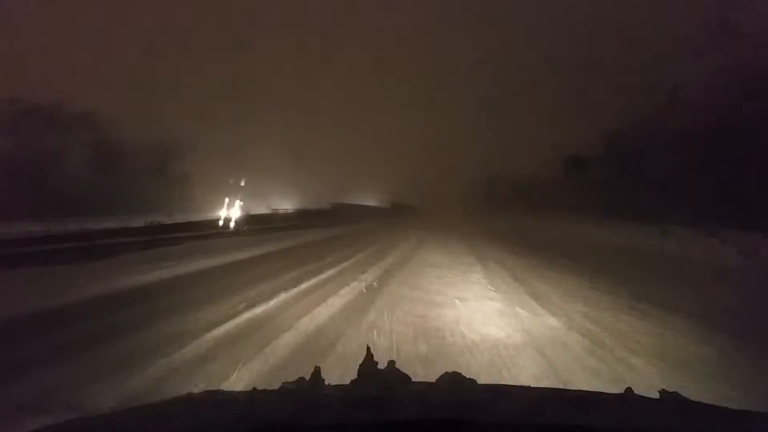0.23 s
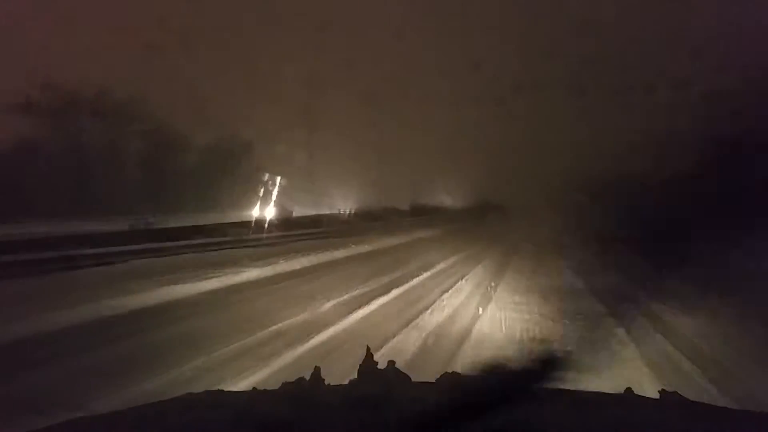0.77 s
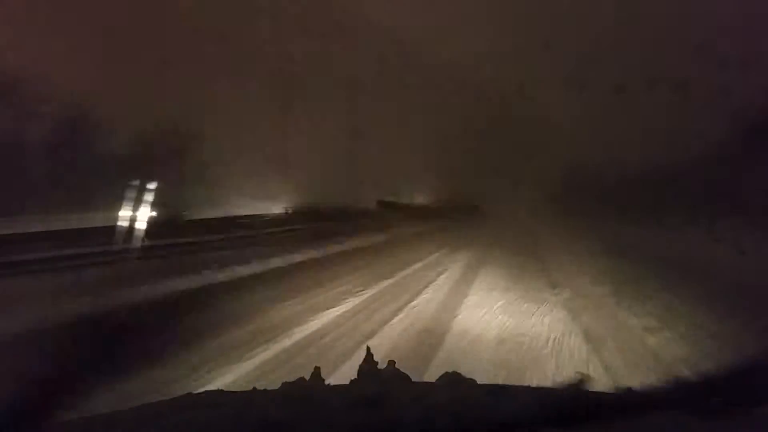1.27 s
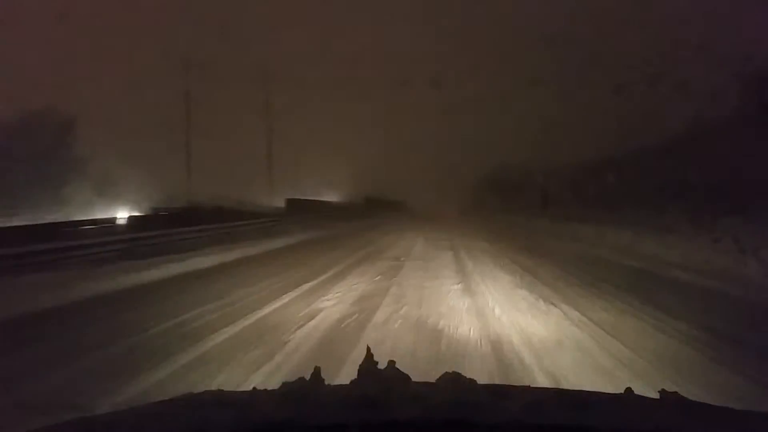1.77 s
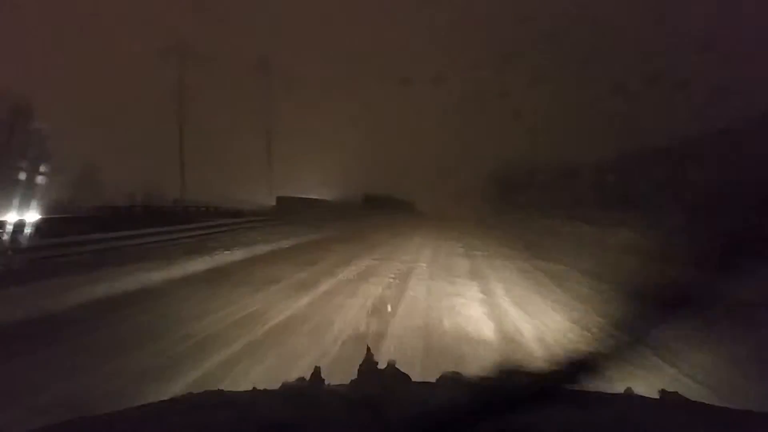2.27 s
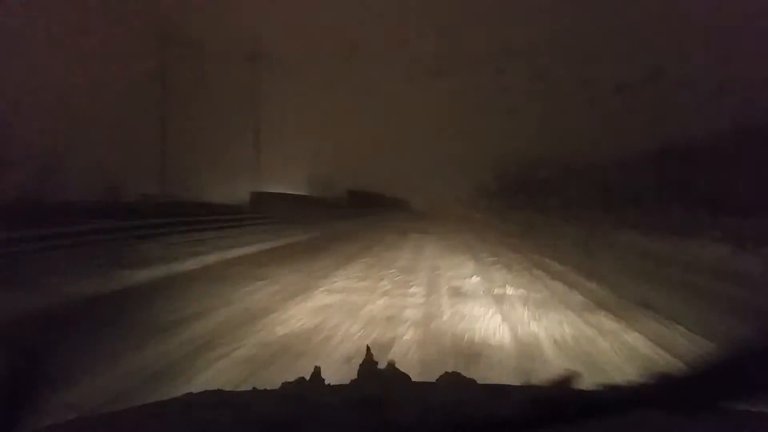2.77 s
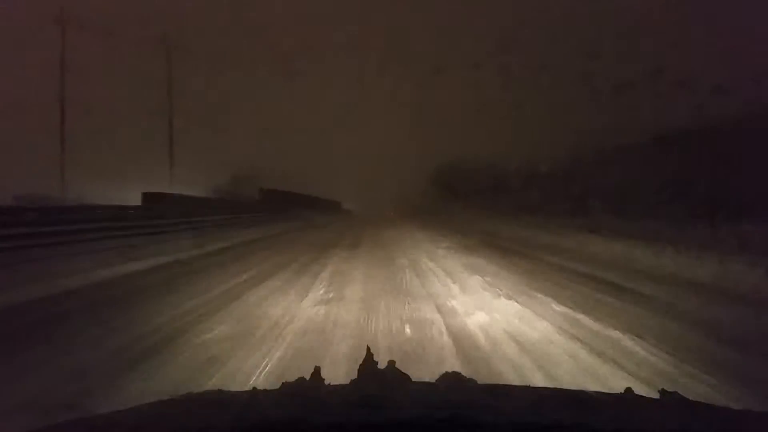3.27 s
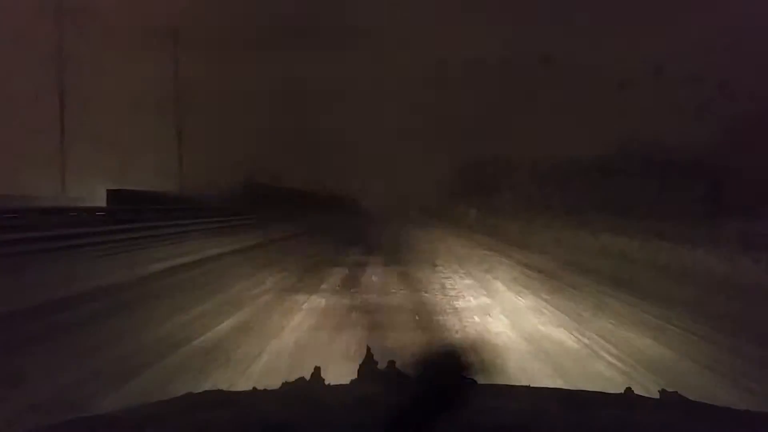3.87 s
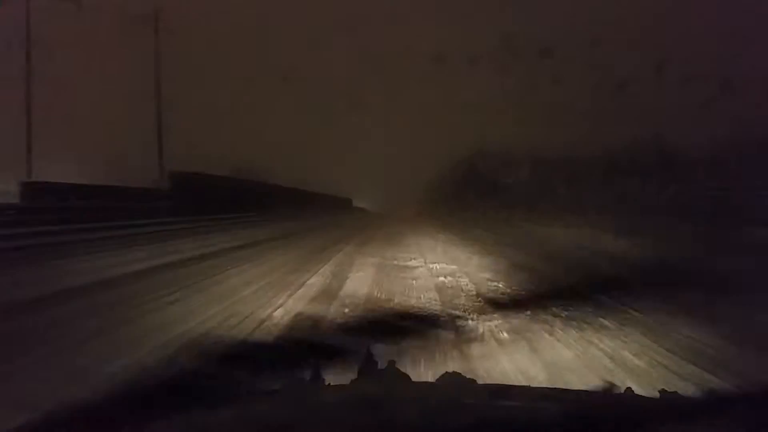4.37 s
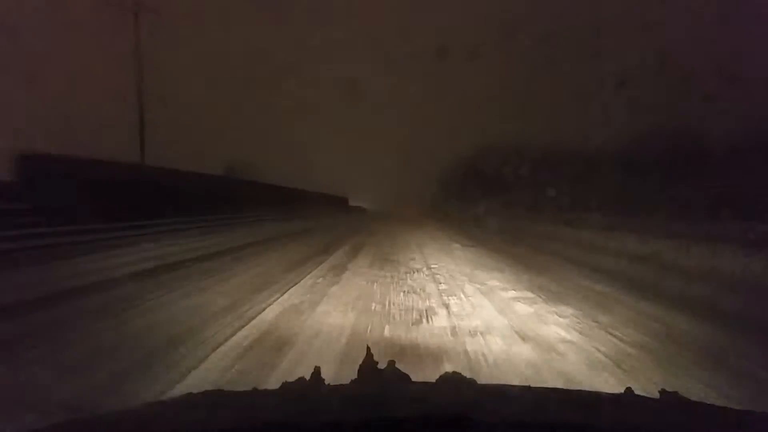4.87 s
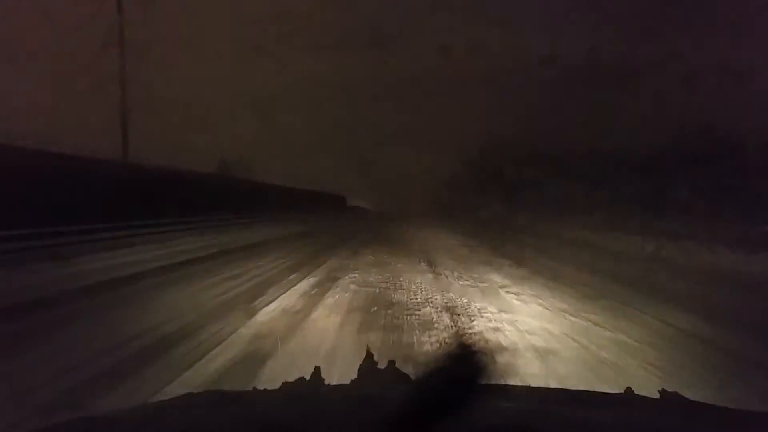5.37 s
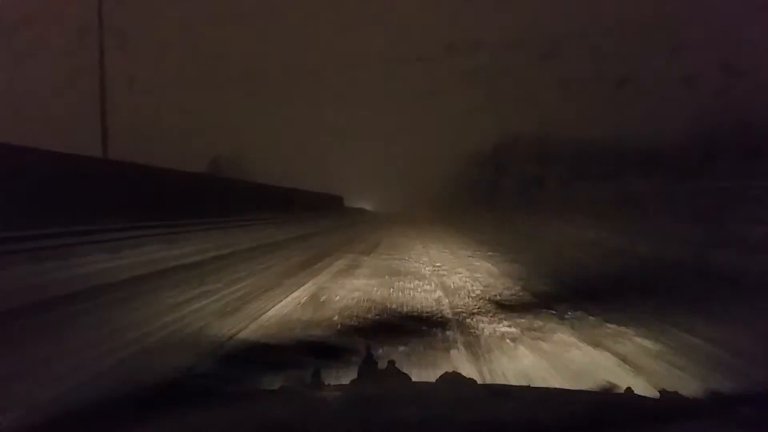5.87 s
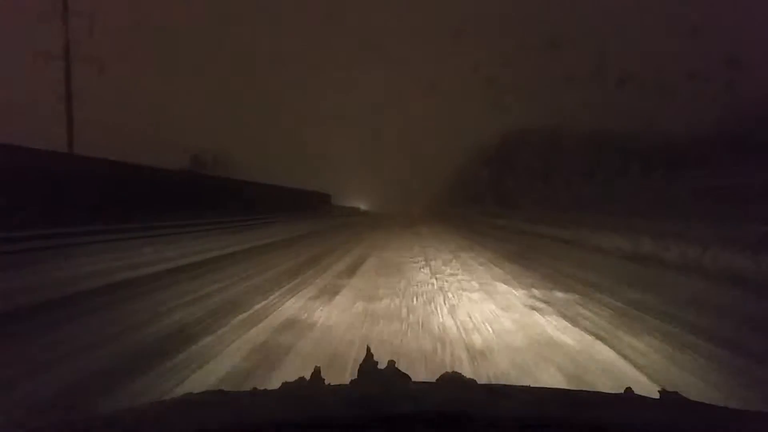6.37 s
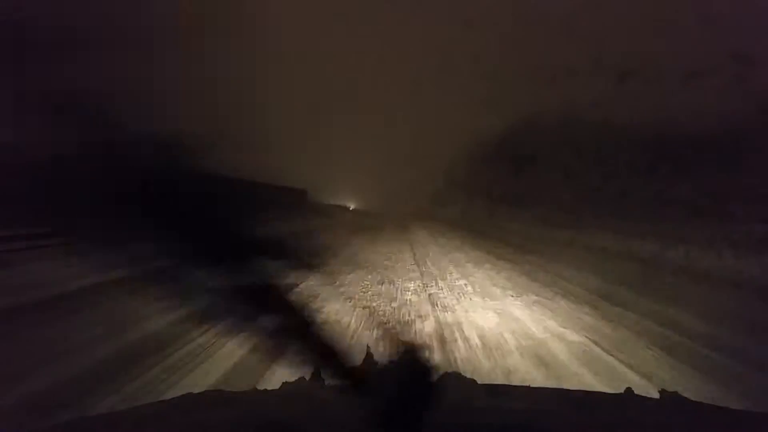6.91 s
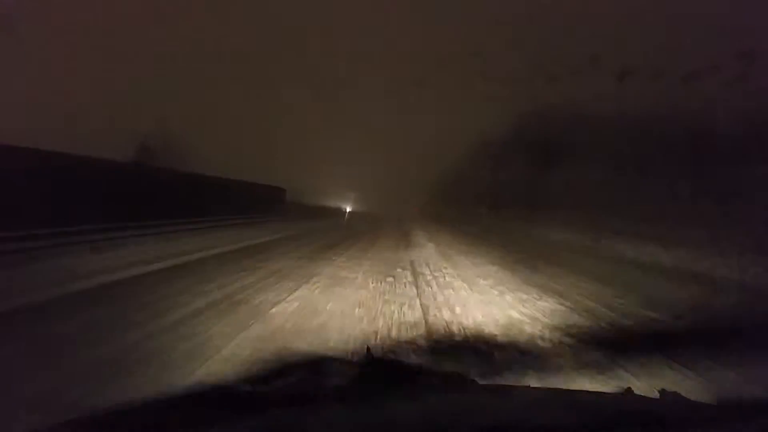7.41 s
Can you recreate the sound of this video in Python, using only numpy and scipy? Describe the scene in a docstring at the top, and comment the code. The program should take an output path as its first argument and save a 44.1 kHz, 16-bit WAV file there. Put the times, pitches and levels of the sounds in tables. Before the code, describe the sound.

From start to finish, about seven and a half seconds, a deep road boom fills the cabin of a car rolling on packed snow, swelling and easing with low bumps. The microphone lies on the dashboard, which shakes and rattles, more on the left. Wipers sweep every second and a half, with a rubbery judder, a dull scrape and small ticks. Quick clusters of knocks mark one end of the stroke at about 0.2, 1.7, 3.3, 4.8, 6.3 and 7.6 seconds; single knocks fall between, clearest near 0.5, 1, 2.5, 4.2 and 5.5 seconds. The knock at 3.3 seconds is the loudest, a hard crack that briefly overloads the microphone. The rumble eases around 2.3, 4 and 6.9 seconds and grows again at the end. Muffled tyre crunch and a faint spray hiss continue underneath, with thin high spits near 3 and 5 seconds.

```python
"""Car on packed snow, wipers running

A phone lies on the dashboard at night, the wipers sweeping every second and a half. The cabin air
booms with the road and bumps with the sweeps; wiper judder, knocks and snow lumps excite the
resonances of the dash, which the left port touches. Blades scrape and tick, one knock cracks hard,
the treads crunch, and snow spray hisses faintly, with a few thin spits."""
import sys
import numpy as np
from scipy import signal
from scipy.fft import rfft, irfft
from scipy.io import wavfile
from scipy.ndimage import uniform_filter1d, minimum_filter1d

SR = 44100
rng = np.random.default_rng(int(sys.argv[2]) if len(sys.argv) > 2 else 0)


def to_wav(sig):
    """Store sig (one row per channel, or 1-D mono) as 16-bit WAV at the path in sys.argv[1].

    Samples outside -1..1 are clipped; the rate is SR.
    """
    pcm = np.clip(np.atleast_2d(sig), -1, 1) * 32767
    pcm = np.round(pcm).astype(np.int16)
    wavfile.write(sys.argv[1], SR, pcm.T)  # frames by channels


N = 337227

# roughness of the snow under the wheels: t/s, boom level/dB, dash shake level/dB, grit level/dB
ROUGHNESS = [(0.0, -24.5, -24, -55.5), (0.78, -28, -27.5, -58.5), (0.93, -26.5, -27, -56.5),
             (1.36, -28.5, -33, -64.5), (1.91, -27.5, -29.5, -59.5), (2.19, -32.5, -33.5, -65),
             (2.52, -32.5, -32, -63.5), (2.89, -26, -29, -57.5), (3.42, -26.5, -26, -59),
             (3.73, -31, -32, -66.5), (4.2, -33, -34.5, -64.5), (4.73, -25.5, -26.5, -59),
             (5.14, -25, -28.5, -57), (5.92, -25, -27.5, -62), (6.13, -24.5, -26.5, -58),
             (6.88, -31.5, -34, -66.5), (7.49, -22.5, -25, -56), (7.62, -24, -25, -56)]
# snow spray: t/s, level/dB
SPRAY_LEVEL = [(0, -61), (.5, -66), (1.3, -65), (1.8, -67), (2.45, -70), (2.85, -62.5), (3.2, -61.5),
               (3.4, -70), (4.05, -75.5), (4.4, -66), (4.75, -65), (5.4, -65), (5.95, -64), (6.4, -68),
               (6.95, -76), (7.45, -62), (7.65, -59)]
# knocks of wiper arms and snow lumps: t/s, level/dB, thud relative to that level/dB
IMPACTS = [(0.203, -4.5, -21), (0.223, -6.5, -19), (0.243, -8, -18), (0.269, -13, -18), (0.43, -16, -15),
           (0.516, -4, -3), (0.53, -9, -10), (0.728, -16, 0), (0.813, -12, -2), (0.972, -3.5, -22),
           (1.159, -11.5, -19), (1.191, -11.5, -17), (1.64, -16, -10), (1.717, -2.5, -16), (1.742, -6, -18),
           (1.757, -7, -18), (1.786, -14, -18), (1.956, -10, -19), (2.493, -8, -11), (2.545, -15, -15),
           (2.678, -13, -12), (2.806, -15.5, 10), (3.034, -13.5, -23.5), (3.16, -17.5, -18),
           (3.247, -6, -15.5), (3.252, 0, -20), (3.264, -7, -15), (3.285, -10, -15), (3.317, -14, -15),
           (3.479, -14, -12), (3.671, -18.5, -10), (3.896, -20.5, 6), (4.025, -16, -7), (4.087, -14.5, -16),
           (4.206, -18, -7), (4.242, -4.5, -16), (4.589, -14, -12), (4.768, -9, -26), (4.789, -8.5, -29.5),
           (4.968, -20, -14), (5.075, -12, -15), (5.165, -17, -12), (5.315, -17, -8), (5.54, -3.5, -16),
           (5.586, -11.5, -11), (5.714, -13, -2.5), (5.752, -7, -8), (5.849, -13, -6), (5.958, -13.5, -9),
           (6.179, -16, -13.5), (6.256, -7, -16), (6.278, -9, -16), (6.863, -20, 4), (6.902, -20, -12),
           (7.025, -13.5, -11), (7.267, -14, -12), (7.597, -7, -20), (7.61, -9, -20)]


def undb(db):
    """Amplitude ratio of a level."""
    return 10 ** (np.asarray(db) / 20)


def curves(table):
    """Columns of a table, interpolated linearly in time."""
    times, *columns = np.transpose(table)
    return [np.interp(np.arange(N) / SR, times, column) for column in columns]


def walk(rate_hz):
    """Slow fluctuation: random steps, smoothed twice; spread near 1."""
    hold = int(SR / rate_hz)
    steps = np.repeat(rng.standard_normal(N // hold + 1), hold)
    return 1.3 * uniform_filter1d(uniform_filter1d(steps, hold), hold)[:N]


def through(x, path, ring=1, size=16384):
    """Minimum-phase filter to each port. Path columns: f/Hz, relative gain left/dB, right/dB."""
    # resonances of cabin and dash: f/Hz, bandwidth/Hz, lift left/dB, right/dB
    modes = [(35, 68, 7.5, 8), (45.5, 29, 0, 0), (83.5, 4, 3.5, 8), (109.2, 78, 8.5, 5),
             (158.9, 10, 8.5, 4), (215, 8.6, 10.5, 4), (252, 7.7, 5, 11), (326.5, 11, 8, -0.5),
             (366.4, 30, 9.5, 0.5), (417, 24, -1, 2.5), (535.7, 84, 6, -1), (704.6, 160, 6.5, -2),
             (719, 35, -2.5, 8.5), (1047, 62, 6, 4.5), (2100, 140, 1.5, 1.5)]
    hz = np.arange(size // 2 + 1) * SR / size + 1
    path_hz, *sides = np.transpose(path)
    lift = sum(np.outer(db, 1 / (1 + (2 * (hz - f) / width) ** 2)) for f, width, *db in modes)
    colour = np.array([np.interp(np.log(hz), np.log(path_hz), db, left=-90, right=-150) for db in sides])
    cepstrum = irfft(np.log(undb(colour + ring * lift)))
    fold = np.where(np.arange(size) < size // 2, 2., 0.)  # folding makes the response causal
    fold[0] = 1
    response = irfft(np.exp(rfft(cepstrum * fold)))[:, :size // 2]
    response *= np.hanning(size)[size // 2:]
    response /= np.sqrt(np.sum(response.mean(axis=0) ** 2))
    return signal.fftconvolve(x, response, axes=1)[:, :N]


def pair(correlation):
    """Partly coherent white noise for the two ports."""
    a, b = rng.standard_normal((2, N))
    return np.array([a, correlation * a + np.sqrt(1 - correlation ** 2) * b])


def bursts(times, level_db, decay_s, rise_s=1e-5):
    """Envelope that rises at each time and decays exponentially."""
    envelope = np.zeros(N)
    for onset, db, decay in np.broadcast(times, level_db, decay_s):
        i = int(onset * SR)
        t = np.arange(1, min(int(6 * decay * SR) + 2, N - i + 1)) / SR
        envelope[i:i + len(t)] += undb(db) * np.exp(-t / decay) * (1 - np.exp(-t / rise_s))
    return envelope


def lumps(rate_hz, spread_db, decay_s):
    """Shot-noise envelope: random jolts over a steady bed; rms 1."""
    when, size = rng.random((int(rate_hz * N / SR), 2)).T
    envelope = .5 + bursts(when * N / SR, -spread_db * np.log(size + 1e-6), decay_s)
    return envelope / np.sqrt(np.mean(envelope ** 2))


def cabin_boom():
    """Forced vibration: the cabin air booms with the road and with low bumps; each knock adds a thud."""
    # low booming bumps, some from the road and one with each wiper sweep: t/s, level/dB, decay time/s
    low_bumps = [(0.059, -21.5, .04), (.5, -18, .04), (.86, -21, 0.032), (1.928, -19, .05), (2.0, -17, .05),
                 (2.36, -20.5, .02), (2.688, -16.5, .03), (2.8, -12.5, 0.031), (3.139, -20, 0.052),
                 (3.457, -17.5, 0.044), (3.62, -21.5, 0.019), (3.89, -21, 0.028), (5.0, -18, .03),
                 (5.3, -21, .04), (5.569, -20, 0.037), (5.825, -17.5, 0.027), (5.949, -16, 0.041),
                 (6.11, -18.5, 0.054), (6.46, -19, 0.038), (6.58, -23, 0.028), (7.128, -20.5, .03),
                 (7.527, -15.5, 0.053)]
    # cabin air: f/Hz, left/dB, right/dB
    path = [(16.1, -19, -17), (29.6, -1.5, -3.5), (60, -5, -9), (121.6, 0.5, -6.5), (173, -15, -19.5),
            (282, -30.5, -33), (540, -61.5, -64.5)]
    times, level_db, thud_db = np.transpose(IMPACTS)
    rolling = undb(curves(ROUGHNESS)[0] + 1.5 * walk(12))
    bumps = bursts(*np.transpose(low_bumps), rise_s=.015)
    thuds = bursts(times, level_db + thud_db - 5.5, decay_s=.0035)
    return through((rolling + bumps + thuds) * pair(.82), path)


def wiper_gains():
    """Cyclic modulation: judder and scrape gains follow one stroke shape, once a sweep."""
    # marks at upper turn, lower turn and halfway up: t/s, sweeps done, judder/dB, scrape/dB
    sweeps = [(-.535, 0, -16, -46), (.225, .5, -15, -46.5), (.52, .69, -13, -44), (.972, 1, -16, -46),
              (1.74, 1.5, -13, -45), (2.0, 1.69, -13, -45), (2.493, 2, -18, -47), (3.26, 2.5, -12, -42),
              (3.52, 2.69, -14, -45), (4.025, 3, -20, -48), (4.785, 3.5, -16, -46), (5.04, 3.69, -17, -45),
              (5.54, 4, -16, -46), (6.275, 4.5, -14, -45), (6.53, 4.69, -15, -46.5), (7, 5, -19, -49),
              (7.79, 5.5, -14, -45)]
    # one sweep, upper turn at 0, lower near .5: phase/cycles, judder/dB, scrape/dB
    stroke = [(0, -24, -18), (.008, -4, -7), (.025, -10, -14), (.04, -7, -3), (.065, -18, -20),
              (.11, -28, -26), (.125, -9, -9.5), (.147, -3, -5), (.175, -18, -18), (.215, -11, -6),
              (.24, -20, -24), (.3, -20, -20), (.36, -11, -14), (.42, -13, -9), (.475, -10, -7), (.5, 0, 0),
              (.525, -5, -4), (.545, -18, -20), (.61, -20, -19), (.65, -6, -7), (.7, -5, -8),
              (.745, -10, -9), (.79, -26, -26), (.905, -30, -30), (.922, -14, -9.5), (.94, -30, -28),
              (1, -24, -18)]
    done, *sweep_db = curves(sweeps)
    phase, *stroke_db = np.transpose(stroke)
    return [undb(np.interp(done % 1, phase, shape) + db) for shape, db in zip(stroke_db, sweep_db)]


def dash_judder(wiper_gain):
    """Structure-borne sound: road and wipers shake the dash, adding in power."""
    # dash panel: f/Hz, left/dB, right/dB
    path = [(64.8, -35.5, -31.5), (135, -11, -15.5), (217, -2, -15.5), (314, 2, -16), (414, -4, -16.5),
            (613, -16.5, -26.5), (838, -28, -36.5), (1130, -47.5, -45), (1910, -73, -78.5)]
    shake = np.hypot(undb(curves(ROUGHNESS)[1]), wiper_gain)
    return through(shake * lumps(140, .27, .006) * pair(.7), path)


def blade_scrape(wiper_gain):
    """Friction noise: rubber on ice makes a dull swish, adding in power to the road's grit."""
    # scrape spectrum: f/Hz, left/dB, right/dB
    path = [(480, -15.5, -23.5), (961, -7.5, -10), (1340, -16, -21), (1690, -25.5, -26.5),
            (2650, -24.5, -33.5), (3780, -33.5, -41.5), (4530, -38, -44.5), (5500, -59, -65.5)]
    grit = np.hypot(undb(curves(ROUGHNESS)[2]), wiper_gain)
    return through(grit * lumps(300, .5, .005) * pair(.071), path)


def tyre_crunch():
    """Transmission loss: the floor muffles snow crunching under the treads; it swells with the spray."""
    # floor: f/Hz, left/dB, right/dB
    path = [(490, -10.5, -16), (1000, -3.5, -5), (1570, -15, -14), (2500, -19.5, -22.5), (3500, -24, -33),
            (4800, -31.5, -40), (5600, -58.5, -62.5)]
    level_db = .62 * curves(SPRAY_LEVEL)[0] - 25.5 + 1.1 * walk(36)
    return through(undb(level_db) * pair(.19), path)


def snow_spray():
    """Resonance: snow thrown against the body hisses in the left port, under an airy swish."""
    # port resonance: f/Hz, left/dB, right/dB
    hiss_path = [(2870, -30.5, -43), (3490, -13, -27), (3860, 2.5, -27), (4780, -7, -28),
                 (5290, -22.5, -42), (5700, -54.5, -62)]
    # swish in the top octave: t/s, level/dB
    swish_level = [(0, -89), (.4, -94), (1.3, -96.5), (2.1, -99), (2.6, -102), (2.8, -90), (3.05, -83),
                   (3.3, -91.5), (3.7, -101), (4.4, -103), (4.7, -88), (5.05, -90.5), (5.3, -99),
                   (6.2, -97.5), (6.5, -103), (7.1, -103), (7.4, -92.5), (7.65, -89)]
    # its spectrum: f/Hz, left/dB, right/dB
    swish_path = [(9500, -39.5, -36.5), (11000, -20.5, -15.5), (12500, -4.5, 0), (14000, -15.5, -9),
                  (15500, -9.5, -1.5), (17000, -12, -5.5), (20000, -60, -60)]
    hiss = undb(curves(SPRAY_LEVEL)[0] + .59 * walk(25)) * pair(.2)
    swish = undb(curves(swish_level)[0] + 2.5 * walk(30)) * pair(.6)
    return through(hiss, hiss_path, ring=0) + through(swish, swish_path, ring=0)


def ticks_and_crack():
    """Transients: sharp ticks within short scrapes, and one hard crack on the loudest knock."""
    # ticks; the two near 3.25 s form the crack on the loudest knock: t/s, level/dB
    ticks = [(0.114, -42.5), (0.148, -41), (0.193, -32), (0.263, -32.5), (0.399, -43), (0.43, -40),
             (0.521, -37), (0.851, -43.5), (1.024, -36), (1.193, -36.5), (1.288, -41), (1.716, -33),
             (1.757, -32.5), (1.786, -35.5), (1.957, -38), (1.992, -40), (2.061, -45), (2.367, -45.5),
             (2.544, -43), (2.676, -41.5), (2.707, -43), (2.801, -37), (3.02, -37), (3.209, -38.5),
             (3.247, -25), (3.252, -20), (3.284, -38.5), (3.317, -39), (3.476, -40.5), (3.527, -40),
             (3.553, -43), (3.893, -45.5), (4.086, -42.5), (4.236, -37.5), (4.26, -40), (4.687, -44),
             (4.783, -33), (4.81, -45), (4.84, -39), (5.072, -41), (5.165, -45), (5.313, -39.5),
             (5.41, -44), (5.591, -38), (5.752, -38), (5.775, -37), (5.849, -33), (5.956, -39.5),
             (6.002, -47), (6.098, -39), (6.201, -43), (6.226, -40), (6.277, -38), (6.325, -39),
             (6.902, -45), (7.023, -42), (7.261, -43), (7.337, -41), (7.371, -43.5), (7.598, -39)]
    # their spectrum: f/Hz, left/dB, right/dB
    path = [(510, -7, -18.5), (910, 3.5, -5), (1320, -3, -11), (1970, -13, -22), (2960, -17.5, -26.5),
            (4200, -23.5, -30.5), (5500, -48, -51)]
    times, level_db = np.transpose(ticks)
    scrape = bursts(times, level_db, decay_s=.003, rise_s=.0013) * pair(.55)
    pulse = bursts(times + .001, level_db + 4, decay_s=.00008)
    return through(scrape + pulse, path)


def dash_knocks():
    """Impact excitation: a hard contact, then a short chatter, rings the modes of the dash."""
    # struck dash: f/Hz, left/dB, right/dB
    path = [(79.4, -27.5, -37), (215, -3, -16.5), (320, 3.5, -15), (487, -4, -23), (760, -17.5, -25.5),
            (1210, -35, -38.5), (1770, -63, -63.5)]
    times, level_db, _ = np.transpose(IMPACTS)
    contact = bursts(times, level_db + 2.5, decay_s=.00019)
    chatter = bursts(times, level_db - 7, decay_s=.0064, rise_s=.0021) * pair(.7)
    return through(contact + chatter, path)


def snow_spits():
    """Broadband transients: thin spits of spray stand out in the high treble."""
    # spits: t/s, level/dB, decay time/s
    spits = [(3.02, -42.5, 0.014), (3.095, -76, .02), (3.565, -74, 0.01), (5.007, -58, 0.0084)]
    # their spectrum: f/Hz, left/dB, right/dB
    path = [(1200, 2.5, -4), (2500, 0.5, -2.5), (4370, -5.5, -3.5), (5500, -9, -19.5), (10000, -30.5, -23),
            (11300, -17, -11), (12700, -1, 3), (14000, -12.5, -10), (15600, -3, -4), (17000, -8.5, -4),
            (20000, -60, -60.5)]
    times, level_db, decay_s = np.transpose(spits)
    envelope = uniform_filter1d(bursts(times + .007, level_db, decay_s), size=700)
    return through(envelope * pair(.85), path, ring=0)


def scene():
    """Superposition of all sources at the two ports."""
    judder_gain, scrape_gain = wiper_gains()
    bed = cabin_boom() + dash_judder(judder_gain) + blade_scrape(scrape_gain)
    return bed + tyre_crunch() + snow_spray() + ticks_and_crack() + dash_knocks() + snow_spits()


def record(dry):
    """Peak limiting: the phone adds faint self-noise, ducks and clips the loudest peaks, cuts the top."""
    self_noise_db, cutoff_hz = -96, 15750
    x = dry + undb(self_noise_db) * pair(.21)
    safe_gain = np.minimum(1, 1 / (np.abs(x).max(axis=0) + 1e-9))
    held_gain = minimum_filter1d(safe_gain, size=801)
    gain = uniform_filter1d(uniform_filter1d(held_gain, size=400), size=400)
    lowpass = signal.ellip(8, .2, 70, cutoff_hz, fs=SR, output="sos")
    return signal.sosfilt(lowpass, np.clip(x * gain, -.996, .996))


dry = scene()
out = record(dry)
to_wav(out)
```